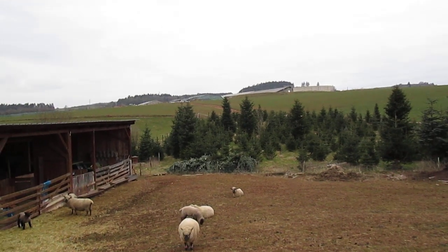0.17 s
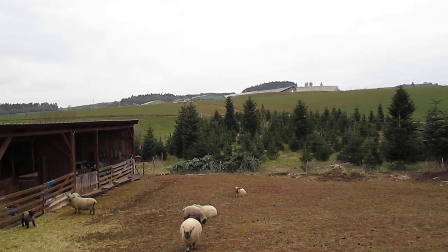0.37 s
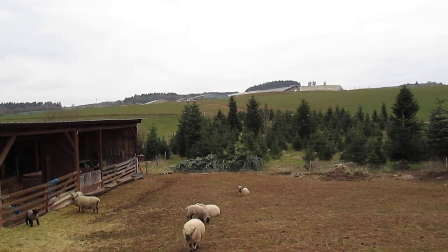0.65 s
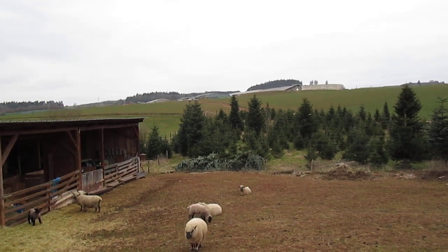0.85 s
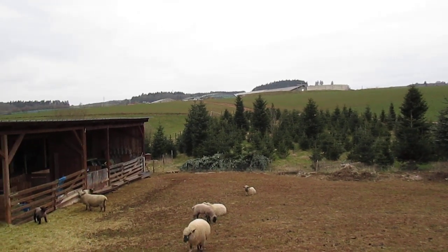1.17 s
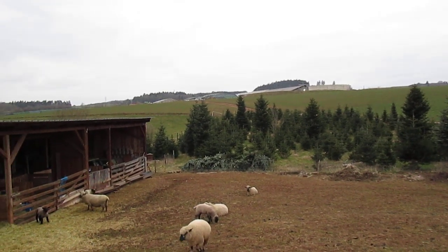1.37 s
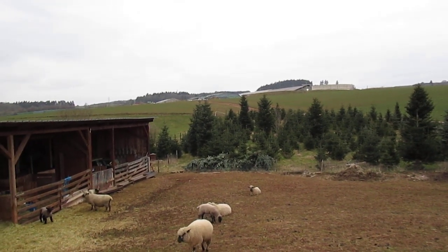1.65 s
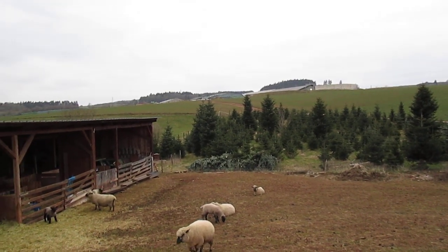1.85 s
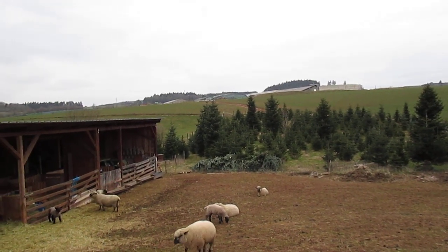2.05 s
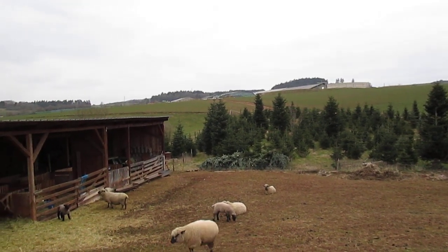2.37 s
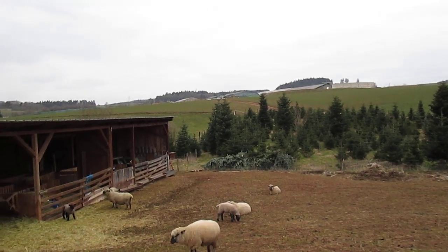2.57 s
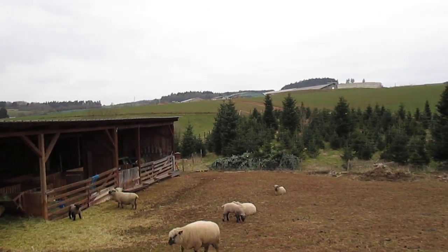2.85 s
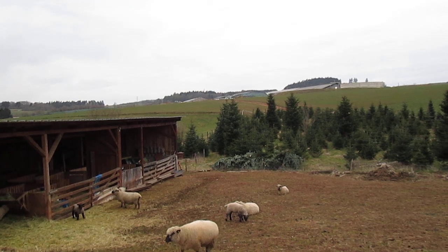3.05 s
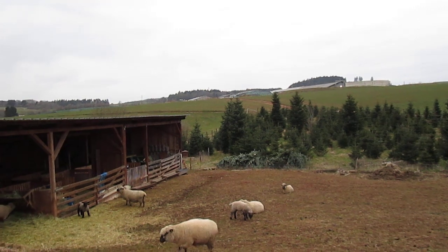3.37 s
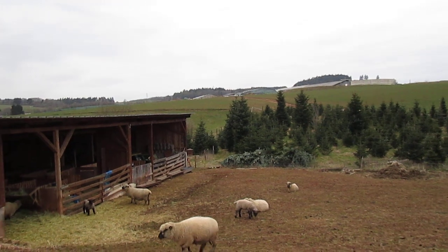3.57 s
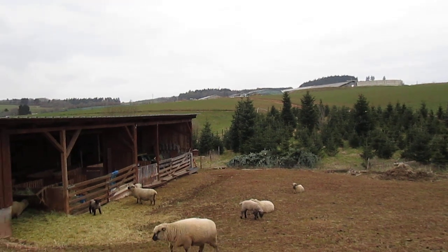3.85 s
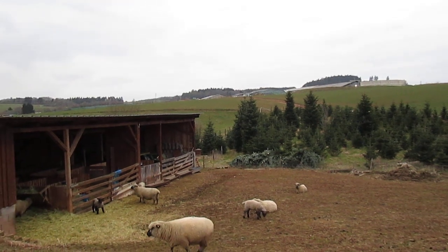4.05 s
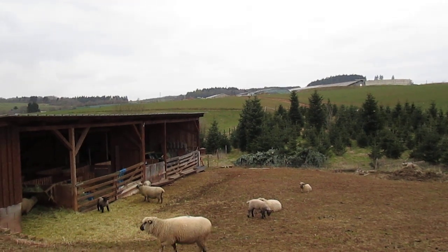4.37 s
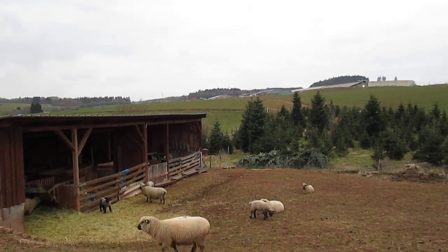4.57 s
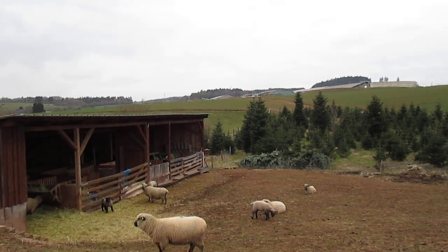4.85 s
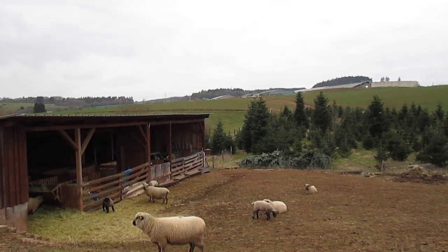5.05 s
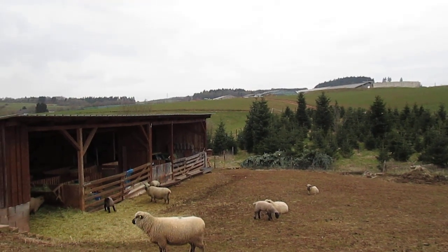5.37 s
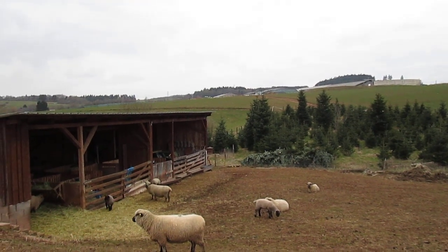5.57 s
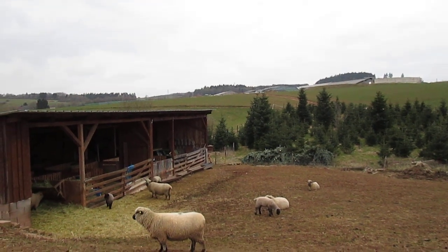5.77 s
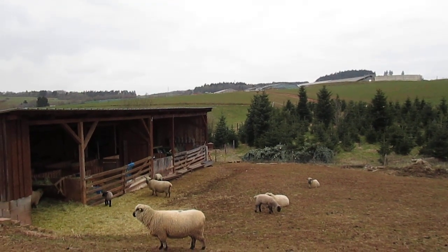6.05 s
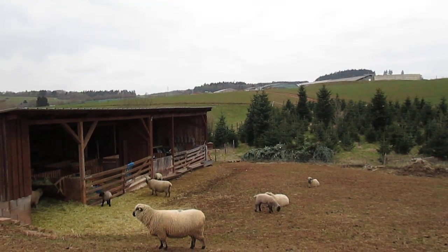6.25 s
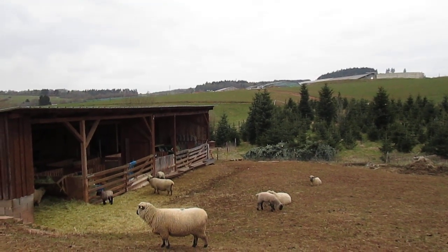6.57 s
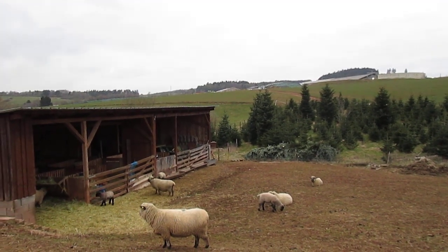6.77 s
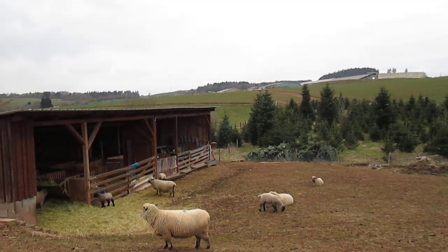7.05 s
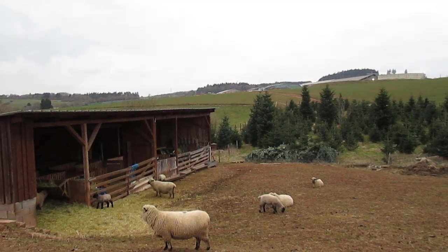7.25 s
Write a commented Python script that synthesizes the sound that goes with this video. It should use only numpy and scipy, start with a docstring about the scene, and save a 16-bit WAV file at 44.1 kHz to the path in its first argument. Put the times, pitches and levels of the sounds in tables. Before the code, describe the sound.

Outdoor paddock: the tail of one rough bleat, a closer stuttering ewe's call, then soft rustle, small ticks, a snort, a hoof knock and birdsong.

```python
"""A hoarsening bleat from a sheep by a wooden shed comes first, over a soft country rush; the shed and slope answer.
A near ewe then bleats with a quaver; birds call, a sheep snorts and a hoof knocks a plank, amid small ticks and thumps.
Voices are pulses and breath through throat resonances; birds are gliding tones; the snort and air are shaped noise.
Ticks, thumps and knock are dying tones, some with noise. One microphone with gain control feeds two channels,
each with its own hiss."""
import sys
import numpy as np
from scipy import signal
from scipy.fft import rfft, irfft, next_fast_len
from scipy.io import wavfile
from scipy.ndimage import uniform_filter1d, map_coordinates

SR = 44100
rng = np.random.default_rng(int(sys.argv[2]) if len(sys.argv) > 2 else 0)


def int16_out(signal):
    """Quantize to a 16-bit WAV file."""
    q = np.round(np.clip(np.atleast_2d(signal).T, -1, 1) * 32767)
    wavfile.write(sys.argv[1], SR, q.astype(np.int16))


N = 326334  # length in samples, about 7.4 s


def amp(db):
    """Turn decibels into a plain multiplier."""
    return 10 ** (np.asarray(db) / 20)


def unit(x):
    """Scale a sound to an average strength (rms) of 1."""
    return x / np.sqrt(np.mean(x ** 2) + 1e-20)


def along(points, hz):
    """Read a curve of (pitch_hz, value) points, spaced the way we hear pitch."""
    point_hz, value = np.transpose(points)
    return np.interp(np.log(hz + 1), np.log(point_hz + 1), value)


def filtered(x, response):
    """Change the strength and timing of each frequency in x by a given response."""
    size = next_fast_len(x.shape[-1] + SR // 4)
    spectrum = rfft(x, size) * response(np.fft.rfftfreq(size, 1 / SR))
    return irfft(spectrum, size)[..., :x.shape[-1]]


def resonant(x, modes, low_hz, top_hz=np.inf):
    """Ring x through hollow-space resonances; little sound escapes below low_hz or above top_hz."""
    def response(f):
        ring = 0
        for k, (center_hz, width_hz, db) in enumerate(modes):
            spread = 1j * f * width_hz
            # neighbours have opposite signs
            ring = ring + (-1) ** k * amp(db) * spread / (center_hz ** 2 - f * f + spread)
        bass_loss = (1j * f / (low_hz + 1j * f)) ** 2
        treble_loss = 1 + np.sqrt(2) * 1j * f / top_hz - (f / top_hz) ** 2
        return ring * bass_loss / treble_loss
    return filtered(x, response)


def wobble(rate):
    """A smooth random curve through this many random points a second."""
    points = rng.standard_normal(int(N * rate / SR) + 4)
    return map_coordinates(points, [np.arange(N) * rate / SR])


def noise(spectrum, patchy_db):
    """Coloured noise of rms 1, uneven because random patches of time and pitch are louder or softer."""
    grains = signal.stft(rng.standard_normal(N), nperseg=512)[2]
    patches = uniform_filter1d(rng.standard_normal(grains.shape), 6, 0)
    patches = uniform_filter1d(patches, 12, 1)
    x = signal.istft(grains * amp(patchy_db * unit(patches)), nperseg=512)[1][:N]
    return unit(filtered(x, lambda hz: amp(along(spectrum, hz))))


def folds(pitch_hz, rough, jitter, scatter_db, snaps=(0,), rests=(0,)):
    """Each closing of the vocal folds gives a pulse; breath bursts once a cycle, more of it when rough."""
    n = len(pitch_hz)
    turn = np.cumsum(pitch_hz) / SR  # cycles so far
    snaps = np.asarray(snaps)
    # after each rest, shift the cycles so that the next snap meets a closing
    coming = np.minimum(np.searchsorted(rests, np.arange(n)), len(snaps) - 1)
    shift = np.round(turn[snaps]) - turn[snaps]
    turn = np.maximum.accumulate(turn + shift[coming])
    k = np.arange(1, int(turn[-1]))
    chance = rng.standard_normal((len(k), 2))
    at = np.interp(k + jitter * chance[:, 0], turn, np.arange(n))
    # spread each pulse over 16 samples, so it can fall between two of them
    taps = np.floor(at)[:, None] + np.arange(-7, 9)
    off = taps - at[:, None]
    size = amp(scatter_db * chance[:, 1])[:, None] * np.sinc(off) * np.cos(np.pi * off / 17) ** 2
    pulses = np.bincount(np.clip(taps, 0, n - 1).astype(int).ravel(), size.ravel(), n)
    breath = rng.standard_normal(n) * np.exp(-2.5 * (turn % 1))
    rough = np.clip(rough, 0, 1)
    return np.sqrt(1 - rough) * unit(pulses) + np.sqrt(rough) * unit(breath)


# how long echoes take to die by 60 dB, before a place's stretch: pitch_hz [Hz], die_away_s [s]
ECHO_TIMES = [(300, 1), (1000, 0.94), (3000, 0.83), (5200, 0.69), (8000, 0.1)]


def echoes(x, gap_s, stretch):
    """After a gap, surfaces return a blurred copy in which each frequency dies at its own speed."""
    hz, t, grains = signal.stft(rng.standard_normal(SR), SR, nperseg=256)
    die_away_s = stretch * along(ECHO_TIMES, hz)[:, None]
    tail = signal.istft(grains * amp(-60 * t / die_away_s), SR, nperseg=256)[1]
    delayed = np.pad(x, (round(gap_s * SR), 0))
    return signal.fftconvolve(delayed, tail / np.linalg.norm(tail))[:len(x)]


def add(track, s, sound):
    """Mix a short sound into a track, starting at second s."""
    part = track[round(s * SR):][:len(sound)]
    part += sound[:len(part)]


# the shed sheep's bleat: start_s [s], pitch_hz [Hz], level_db [dB], tiredness [0-1]
LONG_BLEAT = [(0, 200.4, -19.5, 0.5), (.076, 200.3, -19, 0.44), (0.117, 197.7, -20.5, 0),
              (0.151, 195.1, -18.5, 0.4), (.216, 188.8, -21, 0.54), (.296, 180.8, -22.5, 1),
              (.318, 173.8, -26, 0.98), (.348, 155.9, -29, 1), (.392, 148.8, -48.5, 1),
              (.419, 150.9, -68, 0.96)]
# its throat's resonances, fresh and then tired: pitch_hz [Hz], width_hz [Hz], level_db [dB]
FRESH_THROAT = [(624, 96, 0), (1408, 73, 1.5), (2265, 200, 2), (2596, 164, 3), (3280, 400, -8),
                (4580, 250, -4), (6070, 160, -19), (6930, 700, -44.5)]
TIRED_THROAT = [(595, 74, 4), (1347, 84, -0.5), (2310, 370, -3.5), (2817, 320, -1), (3620, 360, -8.5),
                (5000, 260, -9), (6600, 510, -31)]
LEAD = SR  # samples of bleat before the scene opens (1 s)


def shed_sheep():
    """A bleat already under way, with echoes built up, turns hoarse as the breath runs out."""
    t = np.arange(-LEAD, SR * 2) / SR
    s, hz, db, tired = np.transpose(LONG_BLEAT)
    tired = np.clip(np.interp(t, s, tired), 0, 1)
    rough = .004 + .06 * tired ** 5
    source = folds(np.interp(t, s, hz), rough, jitter=.002, scatter_db=.3)
    fresh = unit(resonant(source, FRESH_THROAT, low_hz=330, top_hz=6060))
    worn = unit(resonant(source, TIRED_THROAT, low_hz=330, top_hz=6060))
    chest = amp(-29) * unit(resonant(source, [(191, 120, 0)], low_hz=90))
    level_db = np.interp(t, s, db) + 2 * tired * wobble(28.26)[:len(t)]
    voice = ((1 - tired) * fresh + tired * worn + chest) * amp(level_db) * (t < s[-1])
    walls = amp(-8) * echoes(voice, .003, stretch=.08) + amp(-6) * echoes(voice, .012, stretch=.25)
    slope = amp(-22.5) * echoes(voice, .06, stretch=1.6)
    heard = voice + walls + slope
    return np.pad(heard[LEAD:], (0, N - 2 * SR))


# tone colours of the air: pitch_hz [Hz], level_db [dB per Hz, relative]
RUMBLE_COLOUR = [(12, -24), (25, -7.5), (75, 0.5), (115, -3), (250, -3.5), (400, -12.5), (700, -120)]
RUSH_COLOUR = [(100, -120), (220, -9.5), (370, -2.5), (650, -3), (1100, -5.5), (1600, -10), (3000, -12),
               (4200, -19), (6000, -120)]
RUSTLE_COLOUR = [(2500, -120), (3200, -8), (4500, -0.5), (5400, -0.5), (6500, -8.5), (8000, -17),
                 (9500, -9.5), (12000, -120)]
CHIRR_COLOUR = [(7400, -54), (7800, 15), (7950, 9), (8100, 10.5), (8500, -51)]
# how the rustle comes and goes: time_s [s], level_db [dB]
RUSTLE_LEVELS = [(2.1, -62), (2.52, -58.5), (3.49, -62.5), (3.88, -59.5), (5.0, -61.5), (6.05, -60.5),
                 (6.45, -58.5), (7.4, -60)]
RUMBLE_DB, RUMBLE_GROWS_DB_PER_S, RUSH_DB = -59.5, 0.46, -56  # rumble level is that of mid-scene


def air():
    """Four wavering noises: low rumble, far rush, bright rustle of straw and needles, thin far chirr."""
    t = np.arange(N) / SR
    rumble_db = RUMBLE_DB + RUMBLE_GROWS_DB_PER_S * (t - t.mean()) + 1.1 * wobble(2.42)
    rush_db = RUSH_DB + 0.059 * wobble(0.2)
    rustle_db = np.interp(t, *np.transpose(RUSTLE_LEVELS))
    rumble = amp(rumble_db + 1.8 * wobble(24)) * noise(RUMBLE_COLOUR, patchy_db=1.9)
    rush = amp(rush_db + .6 * wobble(8)) * noise(RUSH_COLOUR, patchy_db=.8)
    crackle_db = .9 * wobble(9) + 1.3 * wobble(70)
    rustle = amp(rustle_db + crackle_db) * noise(RUSTLE_COLOUR, patchy_db=.9)
    chirr = amp(-76.0 + 1.9 * wobble(2.85)) * noise(CHIRR_COLOUR, patchy_db=6.5)
    return rumble + rush + rustle + chirr


# clear ticks of the shell, before muffling: start_s [s], level_db [dB], pitch_hz [Hz]
TICKS = [(2.0777, -39, 5000), (2.9537, -33.5, 4850), (3.027, -40.5, 3380), (3.6123, -47, 1770),
         (3.795, -33, 5260), (4.0235, -32, 6020), (4.0482, -30.5, 4900), (4.068, -31.5, 4870),
         (4.2393, -37, 5120), (5.433, -30, 5800), (6.843, -30.5, 5840)]
# dull thumps: start_s [s], level_db [dB]
THUMPS = [(0.9, -28), (0.92, -28.5), (3.184, -29.5), (5.573, -32)]
# the plank's ringing tones, added to the knock's level: pitch_hz [Hz], level_db [dB], die_away_s [s per 60 dB]
PLANK = [(501, -4.5, 0.18), (996, -8, 0.15), (1245, -11, 0.2), (2170, -2, 0.055), (3660, 6, 0.034),
         (4750, 11, 0.033), (5450, 17, 0.023)]
KNOCK_S, KNOCK_DB = 5.292, -32
FAINT_TICK_DB, FAINT_TICK_HZ = -47, 4500  # middle of the random range


def small_hits():
    """A hand-held plastic shell ticks in short dying tones; thumps are dull; a hoof makes a plank ring."""
    out, t = np.zeros(N), np.arange(SR // 5) / SR
    # fainter ticks fall at random, about one a second
    when, size, colour = rng.random((round(N / SR), 3)).T
    faint_db = FAINT_TICK_DB + 8 * (size - .5)
    faint_hz = FAINT_TICK_HZ * 2.5 ** (colour - .5)
    faint = np.c_[when * N / SR, faint_db, faint_hz]
    for s, db, hz in np.r_[TICKS, faint]:
        snap = 3.57 * np.sin(2 * np.pi * hz * t) * np.exp(-.6 * hz * t)  # gone in a few cycles
        grit = 0.12 * amp(-60 * t / 0.0026) * rng.standard_normal(len(t))
        add(out, s, amp(db) * (snap + grit))
    wood = sum(amp(db - 60 * t / t60) * np.sin(2 * np.pi * hz * t) for hz, db, t60 in PLANK)
    scrape = 4 * amp(-60 * t / 0.076) * rng.standard_normal(len(t))
    add(out, KNOCK_S, amp(KNOCK_DB) * (1 - np.exp(-t / 0.011)) * (wood + scrape))
    # muffle the treble and thin the bass of ticks and knock
    out = filtered(out, lambda hz: 1 / (1 + 1j * hz / 6500) ** 3 * 1j * hz / (700 + 1j * hz))
    for s, db in THUMPS:
        add(out, s, -amp(db) * np.sin(2 * np.pi * 120 * t) * np.exp(-t / 0.0013))
    return out + amp(-11.5) * echoes(out, .005, stretch=1.0)


# swells of the ewe's voice: top_s [s], level_db [dB], fall_s [s to drop 13.3 dB, before stretch],
# mouth [0 shut, 1 half, 2 or more wide]
SWELLS = [(.996, -48, 0.011, 0.26), (1.089, -37, 0.0084, 0.1), (1.165, -29.5, 0.025, 0.017),
          (1.255, -30.5, 0.02, 0.061), (1.368, -16.5, 0.017, 1.08), (1.434, -19.5, 0.024, 1.75),
          (1.516, -20.5, 0.02, 1.8), (1.597, -21.5, 0.024, 1.83), (1.675, -23, 0.02, 1.83),
          (1.749, -22, 0.026, 1.87), (1.84, -43.5, 0.01, 2.7)]
# quick-rising peaks among the swells: hard catches, short lip clicks and a softer peak:
# top_s [s], level_db [dB], fall_s [s, as above], mouth [as above],
# low_change_db [dB: below zero weakens the low resonances, above zero lifts them]
QUICK_PEAKS = [(1.064, -47, 0.0089, .1, 2), (1.1267, -35.5, 0.0027, 0.74, 10),
               (1.2017, -32.5, 0.0035, 1.9, -4), (1.2712, -20.5, 0.017, 1.2, 5),
               (1.306, -27.5, 0.0031, 0.18, -11), (1.4061, -27, 0.0025, .4, -8),
               (1.4112, -29, 0.0036, 0.44, -5), (1.4646, -23.5, 0.017, 1.58, -5),
               (1.546, -20.5, 0.01, 1.84, 1), (1.6214, -21.5, 0.011, 1.7, -4),
               (1.7012, -21.5, 0.013, 1.68, -6), (1.777, -21.5, 0.0074, 1.68, -1)]
# pitch arches over swells and later climbs steeply into quick peaks: time_s [s], pitch_hz [Hz]
EWE_PITCH = [(1.066, 210), (1.088, 244), (1.108, 200), (1.14, 240), (1.148, 253), (1.167, 258),
             (1.182, 252), (1.192, 212), (1.24, 241), (1.27, 255), (1.284, 222), (1.342, 224), (1.372, 252),
             (1.386, 215), (1.42, 243), (1.444, 260), (1.453, 249), (1.465, 264), (1.488, 225), (1.5, 255),
             (1.52, 268), (1.531, 300), (1.542, 354), (1.553, 245), (1.569, 226), (1.583, 278),
             (1.605, 279), (1.616, 299), (1.625, 263), (1.645, 245), (1.658, 268), (1.678, 277),
             (1.695, 327), (1.706, 272), (1.72, 238), (1.73, 265), (1.757, 282), (1.772, 325), (1.781, 255)]
# throat resonances for each mouth opening: pitch_hz [Hz], width_hz [Hz], level_db [dB],
# late_s [s that it peaks late, for a 0.02 s rise], stretch [times the rise and fall]
SHUT_THROAT = [(253, 33, 6.5, 0.0019, 0.57), (1290, 260, 2.5, 0.007, 0.84), (2090, 240, 4, 0.0032, 0.8),
               (3400, 300, -24, .004, 1), (4730, 290, 5.5, 0.0024, 0.82), (5750, 220, -2.5, 0.011, 0.98),
               (7500, 1200, -27, 0.0091, 0.51)]
HALF_THROAT = [(892, 160, -3.5, -0.0038, 1.3), (1230, 440, -7, 0.00029, 0.83),
               (2276, 260, -1.5, 0.00054, 0.74), (2990, 210, -0.5, -0.0081, 0.83),
               (3290, 290, -2.5, -0.0063, 1.1), (3905, 170, 2.5, 0.0025, 1.1),
               (4740, 610, -11, 0.017, 0.51), (5600, 110, -17, -0.031, 0.74),
               (7500, 400, -27, -0.032, 0.45)]
WIDE_THROAT = [(889, 120, -4.5, 0.01, 1.08), (1015, 193, -4.5, 0.0079, 1.24),
               (1640, 700, -18.5, 0.0097, 0.86), (2420, 214, -1.5, 0.0054, 1.05),
               (3460, 490, -3, 0.0018, 0.89), (4010, 405, -3, -0.0012, 1.32),
               (4770, 800, -7, -0.00051, 1.22), (6900, 1200, -24, -0.014, 1.1)]
RISE_S, SHUT_SLOWER_S = 0.017, 0.01  # a swell's rise before stretch, longer with the mouth shut
QUICK_RISE = 0.22  # a quick peak's rise, as a share of its fall
LOW_UNDER_HZ, LOW_CHANGE_S = 2200, 0.033  # which resonances change at a quick peak, and for how long
SWELL_SHAPE, QUICK_SHAPE = 3.3, 1.6  # how flat-topped a swell and a wide-mouthed quick peak are


def ewe():
    """Sharp fold pulses swell and break about twelve times a second as the mouth opens wider."""
    t = np.arange(SR * 3) / SR
    swell_s, swell_db, swell_fall, swell_mouth = np.transpose(SWELLS)
    quick_s, quick_db, quick_fall, quick_mouth, low_change_db = np.transpose(QUICK_PEAKS)
    swell_rise = RISE_S + SHUT_SLOWER_S * np.clip(1 - swell_mouth, 0, 1)
    top, db = np.r_[swell_s, quick_s], np.r_[swell_db, quick_db]
    mouth = np.clip(np.r_[swell_mouth, quick_mouth], 0, 2)
    rise, fall = np.r_[swell_rise, QUICK_RISE * quick_fall], np.r_[swell_fall, quick_fall]
    pitch_hz = np.interp(t, *np.transpose(EWE_PITCH))
    snaps = np.round(quick_s * SR).astype(int)
    rests = (quick_s + 1.5 * quick_fall) * SR
    source = folds(pitch_hz, .01, jitter=.005, scatter_db=1.1, snaps=snaps, rests=rests)
    span = slice(round(.9 * SR), 2 * SR)  # the stretch of time with voice in it
    quick_shape = np.where(quick_mouth < 1.5, SWELL_SHAPE, QUICK_SHAPE)
    shape = np.r_[np.full(len(swell_s), SWELL_SHAPE), quick_shape][:, None]
    since = t[span] - quick_s[:, None]
    hold = np.clip(since / .002 + 1, 0, 1) * np.clip(1 - since / LOW_CHANGE_S, 0, 1)
    low_change = amp(np.sum(low_change_db[:, None] * hold, axis=0))
    voice = np.zeros(len(t))
    for k, throat in enumerate((SHUT_THROAT, HALF_THROAT, WIDE_THROAT)):
        rows = np.abs(mouth - k) < 1
        share = 1 - np.abs(mouth - k)[rows, None]  # blend neighbouring mouth openings
        loudness = np.std(resonant(source, [mode[:3] for mode in throat], low_hz=203))
        # the throat moves within a swell, so each resonance peaks at its own moment
        for j, (hz, width_hz, mode_db, late, stretch) in enumerate(throat):
            lag = t[span] - (top + late * rise / .02)[rows, None]
            reach = stretch * np.where(lag < 0, rise[rows, None], fall[rows, None])
            level_db = db[rows, None] - 13.3 * np.abs(lag / reach) ** shape[rows]
            effort = np.zeros(len(t))
            effort[span] = np.sum(share * amp(level_db), axis=0)
            if hz < LOW_UNDER_HZ:
                effort[span] *= low_change
            ring = resonant(effort * source, [(hz, width_hz, mode_db)], low_hz=190, top_hz=6640)
            voice += (-1) ** j * ring / loudness
    near = amp(-15) * echoes(voice, 0.004, stretch=0.13)
    far = amp(-24.0) * echoes(voice, 0.038, stretch=0.86)
    return np.pad(voice + near + far, (0, N - len(t)))


# trill notes: start_s [s], length_s [s], level_db [dB at the start], warble_hz [warbles a second],
# extra_swing_hz [Hz of pitch swing that dies away], settle_hz [Hz], onset_s [s]
TRILL = [(4.028, 0.087, -49, 36, 320, 8020, 0.022), (4.177, 0.11, -43, 29, 230, 8210, 0.013),
         (4.338, 0.11, -43, 29, 280, 8100, 0.017), (4.51, .14, -43.5, 34, 180, 8100, 0.011)]
# bird whistles and low pips: start_s [s], length_s [s], from_hz [Hz], to_hz [Hz], level_db [dB]
WHISTLES = [(2.034, 0.13, 5250, 5200, -65), (2.19, 0.074, 4730, 4140, -55), (2.25, 0.069, 3900, 2950, -59),
            (4.436, 0.026, 905, 750, -50), (4.478, 0.024, 766, 836, -48.5), (4.525, 0.0098, 1070, 920, -39),
            (4.568, 0.013, 950, 920, -38.5), (4.695, .07, 4950, 4850, -59), (5.392, 0.071, 4690, 4180, -52),
            (5.466, 0.038, 3630, 3130, -58), (6.563, 0.073, 5430, 4530, -46.5),
            (6.557, 0.083, 4450, 4410, -44), (6.561, 0.078, 4000, 3970, -52)]


def birds():
    """Trills deep in the firs warble some thirty times a second and climb a little; whistles glide."""
    trill, song = np.zeros(N), np.zeros(N)
    for s, length, db, warble_hz, extra_swing_hz, settle_hz, onset in TRILL:
        t = np.arange(round(length * SR)) / SR
        warble = np.cos(2 * np.pi * warble_hz * np.maximum(t - .012, 0))
        climb_hz = settle_hz - 280 * np.exp(-t / 0.0694)
        swing_hz = 90 + extra_swing_hz * np.exp(-t / 0.057)
        hz = climb_hz + swing_hz * warble + 50 * wobble(61.0)[:len(t)]
        edges = np.sin(np.pi * t / length) ** 0.15 * np.clip(t / onset, 0, 1)
        loud = amp(db - 29 * t + 2.8 * wobble(44)[:len(t)]) * edges
        add(trill, s, loud * np.sin(2 * np.pi * np.cumsum(hz) / SR))
    for s, length, from_hz, to_hz, db in WHISTLES:
        u = np.arange(round(length * SR)) / (length * SR)  # 0 at the start, 1 at the end
        glide_hz = to_hz + (from_hz - to_hz) * (1 - u) ** 1.5
        hz = glide_hz * (1 + 0.01 * wobble(330)[:len(u)])
        add(song, s, amp(db) * np.sin(np.pi * u ** 0.72) * np.sin(2 * np.pi * np.cumsum(hz) / SR))
    near = amp(-9) * echoes(song, .01, stretch=.35)
    far = amp(-0.5) * echoes(trill, 0.0099, stretch=2.5)
    return trill + far + song + near


# resonances of a sheep's nostrils: pitch_hz [Hz], width_hz [Hz], level_db [dB]
NOSTRILS = [(1460, 630, -3.5), (3400, 1400, -4), (5140, 810, -3)]
SNORT_S, SNORT_DB = 3.262, -39  # moment and level of the top
# it sets in this long before the top and this much under it, then fades steadily
SNORT_ONSET_S, SNORT_SWELL_DB, SNORT_FADE_DB_PER_S = 0.044, 7, 143


def snort():
    """Rushing air rings in a sheep's nostrils: a sudden start, a swell, a steady fade."""
    blast = unit(resonant(rng.standard_normal(N), NOSTRILS, low_hz=870)) * amp(0.62 * wobble(150))
    t = np.arange(N) / SR - SNORT_S
    db = np.where(t < 0, SNORT_SWELL_DB * t / SNORT_ONSET_S, -SNORT_FADE_DB_PER_S * t)
    opening = np.clip((t + SNORT_ONSET_S) / 0.023 + 1, 0, 1) ** 2
    return blast * opening * amp(SNORT_DB + np.maximum(db, -120))


def scene():
    """One microphone feeds both channels."""
    mono = shed_sheep() + air() + small_hits() + ewe() + birds() + snort()
    return np.array([mono, mono])


# tone colour of the channel hiss: pitch_hz [Hz], level_db [dB per Hz, relative]
HISS_COLOUR = [(59, -41), (100, -12.5), (479, -4), (1740, -19), (2600, -18.5), (3970, -9.5), (15700, -1.5)]
TOP_HZ = 15760  # nothing passes above this


def record(dry):
    """A lopsided capsule bends the wave; gain control cuts loud peaks at once and recovers slowly."""
    crests = filtered(dry[0] ** 2, lambda hz: .5 / (1 + (900 / (hz + 1)) ** 4))
    # the steepest rising fronts kick the resting point
    steep = np.maximum(np.diff(dry[0], prepend=0) - .092, 0)
    drift = filtered(steep, lambda hz: 10 / (1 + 1j * hz / 60) / (1 + 1j * hz / 700))
    x = dry[0] + crests + drift
    x = filtered(x, lambda hz: 1 / np.sqrt(1 + (hz / 8500) ** 16))
    # gain control: a quarter of what exceeds -23 dB is cut, then given back at 9 dB a second
    cut_db = 0.25 * np.maximum(20 * np.log10(np.abs(x) + 1e-9) + 23, 0)
    release_db = 9 * np.arange(N) / SR
    held_db = np.maximum.accumulate(cut_db + release_db) - release_db
    x = x * amp(-uniform_filter1d(held_db, size=256))
    # the channels differ by a faint, flickering share of the treble
    apart = amp(-24) * filtered(x * wobble(150), lambda hz: 1 / (1 + (2100 / (hz + 1)) ** 4))
    hiss = amp(-62.5) * np.array([noise(HISS_COLOUR, patchy_db=3.5), noise(HISS_COLOUR, patchy_db=3.5)])
    both = x + [apart, -apart] + hiss
    return filtered(both, lambda hz: hz < TOP_HZ) - .0041  # a small constant offset


dry = scene()
out = record(dry)
int16_out(out)
```